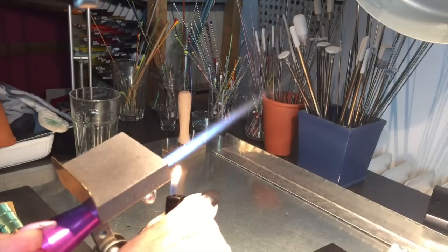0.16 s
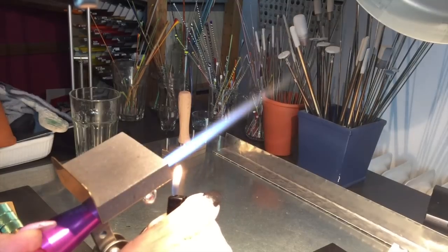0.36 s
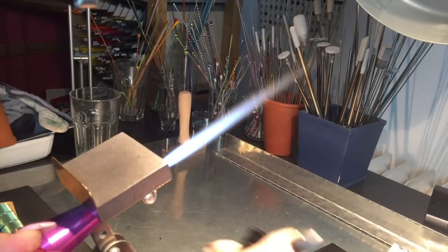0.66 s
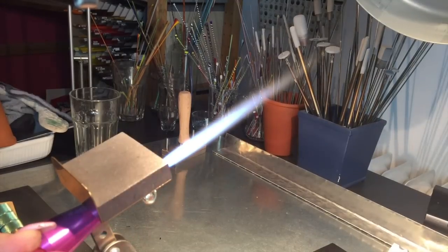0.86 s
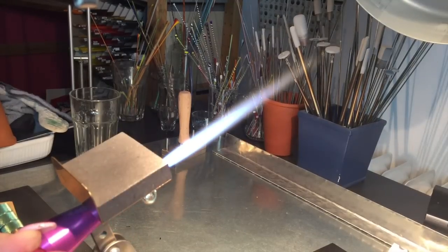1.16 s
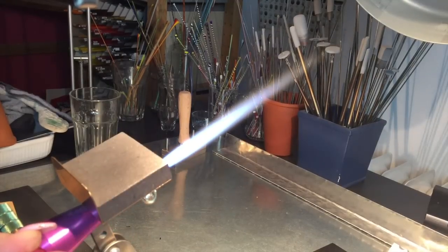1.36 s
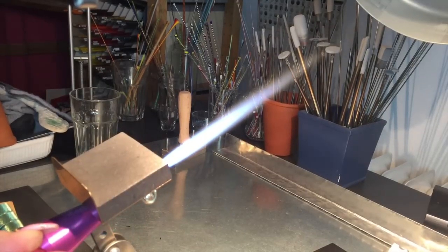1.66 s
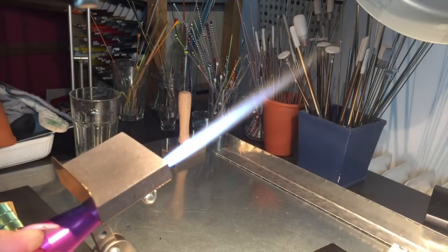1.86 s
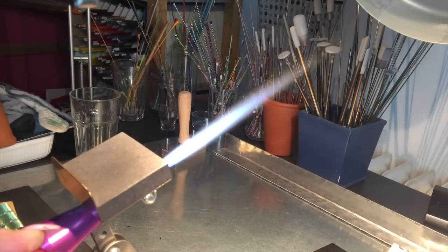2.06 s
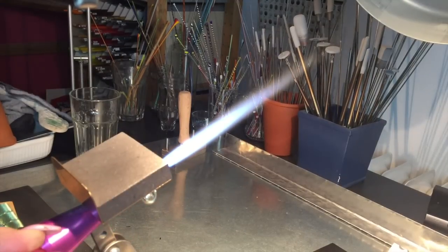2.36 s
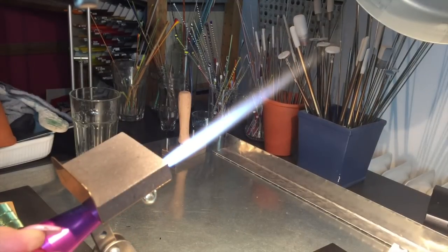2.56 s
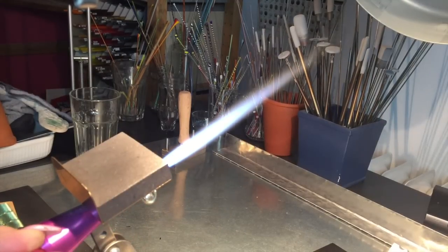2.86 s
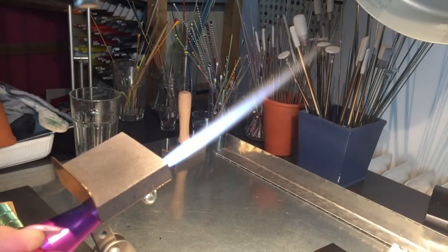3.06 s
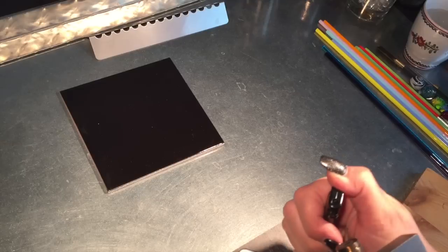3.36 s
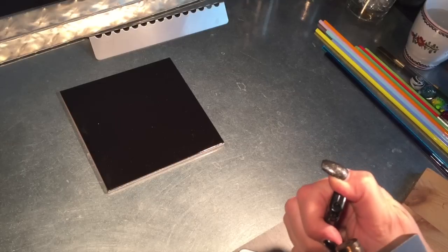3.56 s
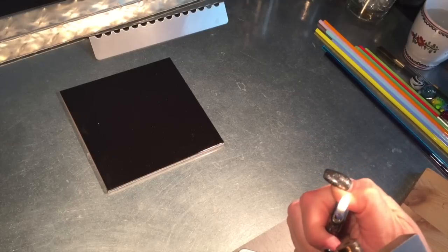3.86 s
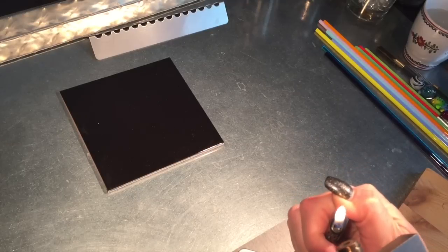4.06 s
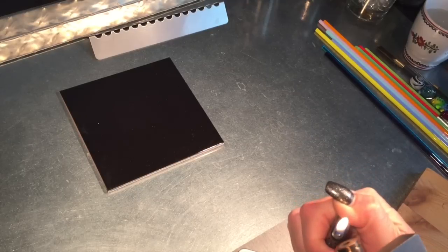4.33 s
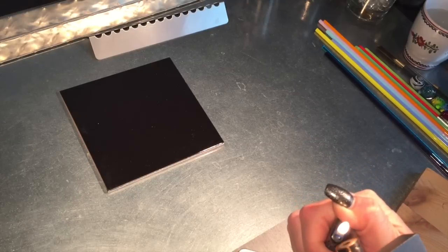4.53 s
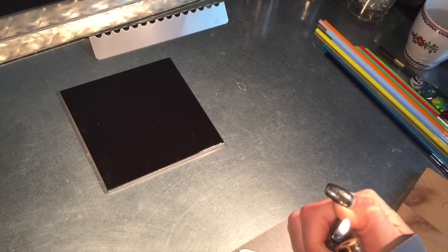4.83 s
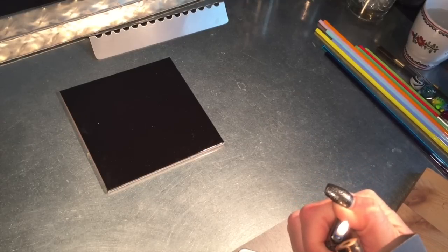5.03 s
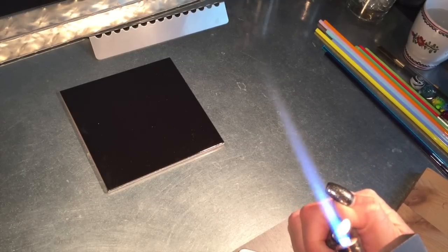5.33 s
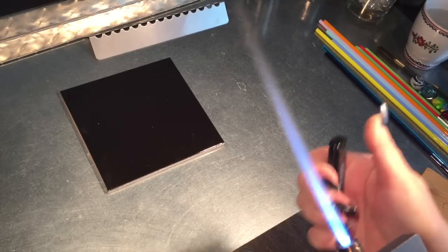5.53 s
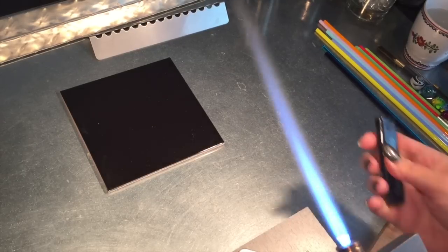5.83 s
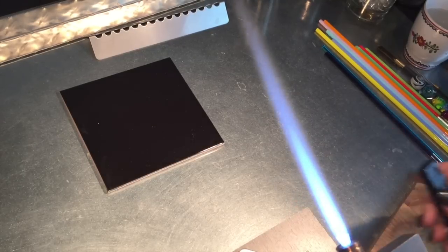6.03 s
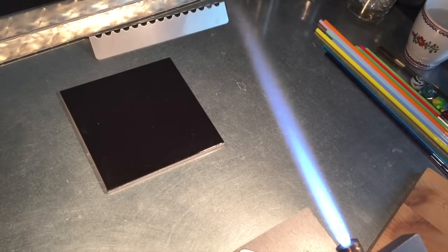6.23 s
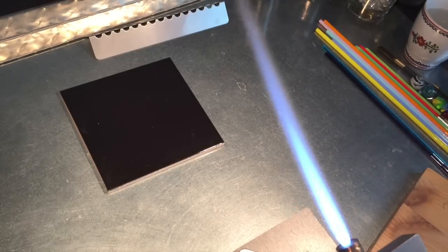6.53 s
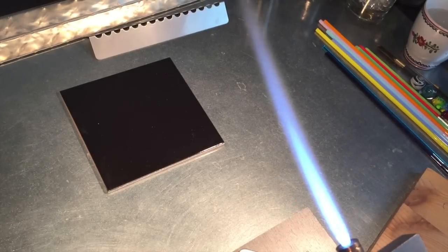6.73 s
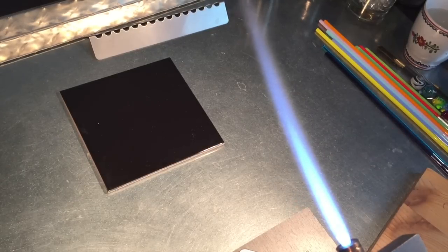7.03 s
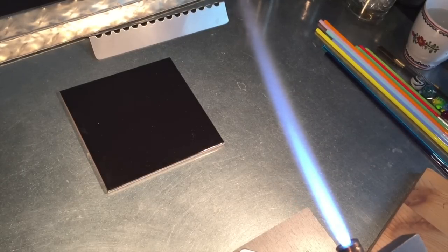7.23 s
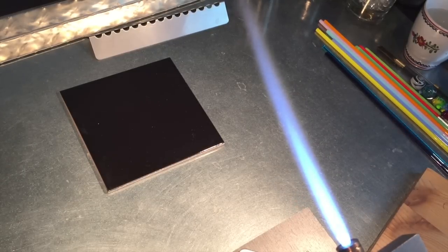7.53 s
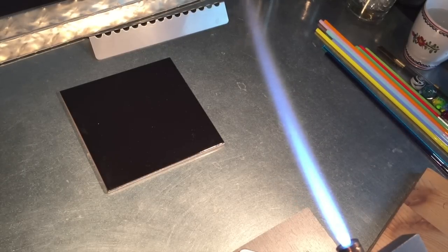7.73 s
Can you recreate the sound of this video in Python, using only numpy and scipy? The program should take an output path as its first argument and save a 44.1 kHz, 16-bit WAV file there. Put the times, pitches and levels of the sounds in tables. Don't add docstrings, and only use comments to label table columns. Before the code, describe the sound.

Three hard lighter clicks ring in a room, quiet background turning abruptly to louder rumble, then a faint gas flame flutters and the lighter scrapes down.

```python
import sys
import numpy as np
from scipy import signal
from scipy.io import wavfile
from scipy.ndimage import uniform_filter1d

SR = 44100
rng = np.random.default_rng(int(sys.argv[2]) if len(sys.argv) > 2 else 0)


def waveform_to_disk(signal):
    frames = np.transpose(np.atleast_2d(signal))
    scaled = np.clip(frames, -1, 1) * 32767
    samples = np.round(scaled).astype(np.int16)
    wavfile.write(sys.argv[1], SR, samples)


def magnitude_from_level(level_db):
    exponent = np.asarray(level_db, float) / 20
    return 10 ** exponent


N = 347799
CUT_S, LIT_S = 3.31, 5.3


def evened(x):
    return x / np.sqrt(np.mean(x ** 2) + 1e-20)


def read(points, hz):
    f, value = np.transpose(points)
    return np.interp(np.log(hz + 1), np.log(f + 1), value)


def curve(rows):
    return np.interp(np.arange(N) / SR, *np.transpose(rows))


def add(mix, s, sound):
    part = mix[round(s * SR):][:len(sound)]
    part += sound[:len(part)]


def wander(x, samples):
    return evened(uniform_filter1d(uniform_filter1d(x, size=samples), size=samples))


def ring(x, hz, width):
    r = np.exp(-np.pi * width / SR)
    return 2 * (1 - r) * signal.lfilter([1], [1, -r * np.exp(2j * np.pi * hz / SR)], x).real


def noise(shape, modes=(), patchy_db=4.0, size=4096):
    hz = np.fft.rfftfreq(size, 1 / SR)
    a, b, patches = rng.standard_normal((N * 4 // size + 5, len(hz), 3)).T
    patches = uniform_filter1d(patches, size=size // 128, axis=0)
    patches = evened(uniform_filter1d(patches, size=2, axis=1))
    db = read(shape, hz)
    for f, width, lift in modes:
        db = db + lift / (1 + (2 * (hz - f) / width) ** 2)
    z = (a + 1j * b) * magnitude_from_level(db[:, None] + patchy_db * patches)
    return evened(signal.istft(z, nperseg=size, noverlap=size * 3 // 4)[1][:N])


def room(x, slower):
    # pitch in Hz, time to fade by 60 dB in seconds.
    fade_times = [(250, 0.58), (660, 0.37), (1740, 0.45), (4590, 0.42), (8000, 0.29), (12100, 0.21),
                  (15000, 0.21)]
    taps = np.zeros(SR // 2)
    at = np.arange(100, SR // 2 - 20, 10)
    taps[at + rng.integers(0, 10, len(at))] = rng.choice([-1., 1.], len(at))
    hz, t, z = signal.stft(taps, SR, nperseg=128)
    t60 = slower * read(fade_times, hz)[:, None]
    tail = signal.istft(z * magnitude_from_level(-60 * t / t60), SR, nperseg=128)[1]
    return signal.fftconvolve(x, tail / np.linalg.norm(tail))[:N]


def colour(shape, tilt_db=0):
    hz = abs(np.fft.fftfreq(2048, 1 / SR))
    db = read(shape, hz) + tilt_db * np.log2(hz / 2000 + .05)
    log_gain = np.log(magnitude_from_level(np.maximum(db, -100)))
    return np.fft.ifft(np.exp(np.conj(signal.hilbert(log_gain)))).real[:1024]


def gain_control():
    # start in seconds, change in dB, fall time in seconds, hold time in seconds.
    ducks = [
        (3.753, -20, 0.013, 0.1),
        (5.291, -17.5, 0.071, 0.096),
        (7.08, -5, .08, 0.018),
    ]
    recover_s, rest_db = .21, -.5
    t = np.arange(N) / SR
    gain_db = rest_db * (t > CUT_S)
    for s, db, fall, hold in ducks:
        falling = np.clip((t - s) / fall, 0, 1)
        creeping_back = np.exp(-np.maximum(t - s - fall - hold, 0) / recover_s)
        gain_db = gain_db + db * falling * creeping_back
    return gain_db


def workshop():
    # pitch in Hz, level in dB per Hz.
    side_wash = [(15, -70), (25, -61), (48, -14), (91, -11), (113, 1.5), (152, -3.5), (254, 0), (361, -4.5),
                 (402, -17), (854, -14), (1120, -18.5), (1770, -19.5), (2440, -29.5), (14500, -63.5),
                 (15700, -63)]
    top_wash = [(15, -51), (25, -29.5), (113, -1.5), (247, -3), (299, -9), (361, -11.5), (498, -17),
                (652, -11.5), (951, -26), (1680, -24), (2080, -30.5), (7380, -48.5), (9930, -47),
                (15700, -54.5)]
    # pitch in Hz,
    # width in Hz, lift in dB (dips are negative).
    side_modes = [(128.5, 14, 3.5), (149, 9.5, -9), (197, 8.7, 5), (253, 22, 3), (360, 54, 2.5),
                  (520, 44, -8), (881, 32, 7.5), (1310, 34, 6), (1460, 6.4, -12), (1650, 33, 8.5),
                  (1800, 6.6, 11), (1840, 14, 13.5), (2692, 53, 10), (8150, 400, 7), (8730, 410, 8.5),
                  (9900, 490, 9), (10400, 200, -7)]
    top_modes = [(123.4, 15.3, 7.5), (147, 12.4, -15.5), (165.6, 6.1, 4.5), (253.6, 19.6, 9),
                 (294, 4.9, -7.5), (356.6, 16.8, 9), (458, 34, 7.5), (470, 10, -1), (656, 14, 8),
                 (588, 62, 2.5), (1103, 150, 8), (1622, 48, 11), (1748, 15, 16.5), (2720, 92, 8),
                 (3154, 18, 13), (5450, 72, 4), (8170, 180, 8.5), (8440, 34, 15.5), (10900, 220, -8),
                 (1220, 42, 7.5), (1806, 49, 9.5), (378, 5.4, 2), (862, 14.5, 11.5), (1886, 11, -12),
                 (2400, 51, 4.5)]
    side_db, top_db = -46.5, -28.5
    lamp_hz, lamp_side_db, lamp_top_db = 14261, -94, -79
    t = np.arange(N) / SR
    top = np.clip((t - CUT_S) / 0.014 + .5, 0, 1)
    waver_db = 2.7 * wander(rng.standard_normal(N), 6000)
    whine = magnitude_from_level(waver_db) * np.sqrt(2) * np.sin(2 * np.pi * lamp_hz * t) * (t < LIT_S)
    side_fan = magnitude_from_level(side_db) * noise(side_wash, side_modes, patchy_db=2.6, size=8192)
    top_fan = magnitude_from_level(top_db) * noise(top_wash, top_modes, patchy_db=0.7, size=8192)
    side_view = side_fan + magnitude_from_level(lamp_side_db) * whine
    top_view = top_fan + magnitude_from_level(lamp_top_db) * whine
    return (1 - top) * side_view + top * top_view


def nozzle():
    # pitch in Hz, width in Hz, level in dB.
    whistles = [
        (9870, 100, -2),
        (9930, 140, 4),
    ]
    unlit_db, lit_db, waver_db = -61.5, -66, 1.6
    follow = 0.64
    jet = rng.standard_normal(N)
    tone = sum(magnitude_from_level(db) * ring(ring(jet, hz, width), hz, width) for hz, width, db in whistles)
    level_db = np.where(np.arange(N) < LIT_S * SR, unlit_db, lit_db) + waver_db * wander(jet, 7000)
    return magnitude_from_level(level_db + follow * gain_control()) * evened(tone) * (np.arange(N) > CUT_S * SR)


def flame():
    # pitch in Hz, level in dB per Hz.
    rush = [(300, -14), (500, 3), (800, 1), (1260, 3.5), (1500, 4), (1750, -5), (1950, -6.5), (2600, -7),
            (4000, -30), (8000, -45)]
    # time in seconds, level in dB.
    growth = [
        (5.3, -31),
        (5.6, -41),
        (6.0, -40.5),
        (6.5, -38.5),
        (6.95, -37),
        (7.3, -38),
        (7.89, -38.5),
    ]
    flicker_db = evened(uniform_filter1d(rng.standard_normal(N), size=1500))
    burning = noise(rush, patchy_db=2.5, size=1024) * (np.arange(N) > LIT_S * SR)
    return magnitude_from_level(curve(growth) + flicker_db) * burning


def slide():
    # time in seconds, level in dB.
    rub = [
        (6.97, -65),
        (6.986, -43.5),
        (7.108, -43),
        (7.128, -36.5),
        (7.146, -39.5),
        (7.22, -61),
    ]
    # pitch in Hz, level in dB per Hz.
    scrape = [(350, -34), (600, -6.5), (1580, -8.5), (2520, -21.5), (4010, -24), (10700, -40.5),
              (12800, -41), (15700, -46)]
    # pitch in Hz, width in Hz, lift in dB.
    body_modes = [(3200, 410, 9), (4400, 360, 6.5), (6300, 350, 9), (8600, 300, 8), (12800, 500, 8),
                  (14000, 400, 6)]
    slips_per_s, slip_fade_s = 1100, .001
    slips = magnitude_from_level(2.5 * np.minimum(rng.exponential(1, N), 3)) * (rng.random(N) < slips_per_s / SR)
    slips = evened(np.convolve(slips, np.exp(-np.arange(400) / SR / slip_fade_s))[:N])
    grain = .55 + .55 * slips
    before, after = (rub[0][0] - .03, -90), (rub[-1][0] + .04, -90)
    level_db = curve([before] + [tuple(r) for r in rub] + [after]) + 7.5
    return magnitude_from_level(level_db) * grain * noise(scrape, body_modes, patchy_db=3.5, size=512)


def fingers():
    # time in seconds, peak in dB, pitch in Hz, width in Hz.
    taps = [(4.176, -50, 7000, 4000), (4.335, -54, 7000, 4000), (4.623, -51, 7040, 4000),
            (5.514, -48, 6000, 5000), (5.537, -37, 4550, 3000), (5.537, -38.5, 8500, 3000),
            (5.537, -33.5, 2000, 1500), (5.987, -42, 6300, 1500), (6.11, -52, 9000, 3000),
            (6.135, -42, 8500, 4000), (6.196, -48, 8000, 2000), (6.39, -40.5, 6460, 3000),
            (6.389, -48, 13000, 3000), (6.741, -40.5, 8000, 6000), (6.919, -33, 4250, 1500),
            (6.914, -42, 4000, 3000), (7.118, -22.5, 13300, 4000), (7.1185, -27, 5500, 7000),
            (7.1275, -19, 1730, 900), (7.128, -25.5, 9750, 7890), (7.128, -30, 3600, 2500)]
    # time in seconds, peak in dB, pitch in Hz, width in Hz.
    brushes = [(.433, -66, 9000, 600), (3.523, -45, 6300, 600), (3.523, -35.5, 9100, 3900),
               (3.524, -36, 14500, 2520), (3.525, -43, 3480, 1200), (6.555, -40.5, 8700, 3000),
               (6.555, -44, 12700, 2500), (6.66, -48, 12500, 3000), (6.75, -53, 12800, 1500),
               (7.0, -53, 12800, 800), (7.16, -56, 11700, 495)]
    # time in seconds, peak in dB, pitch in Hz, width
    # in Hz.
    rasps = [
        (.078, -59, 5000, 8000),
        (.564, -60.5, 2720, 60),
        (3.722, -40, 3000, 3000),
        (5.275, -40, 4000, 3000),
        (7.158, -26.5, 1740, 302),
    ]
    out, t = np.zeros(N), np.arange(3000) / SR
    for rows, ms in ((taps, 3.7), (brushes, 11), (rasps, 19)):
        for s, db, hz, width in rows:
            grit = rng.standard_normal(len(t)) * np.exp(-(1000 * t / ms) ** 2)
            sound = ring(ring(grit, hz, width), hz, width)
            add(out, s, magnitude_from_level(db) * sound / abs(sound).max())
    return out + magnitude_from_level(-3.5) * room(out, 0.69)


def puff():
    # level in dB, pitch in Hz, time to fade by 60 dB in seconds.
    db, hz, t60 = (-19.5, 72, 0.078)
    out, t = np.zeros(N), np.arange(6000) / SR
    swing = np.sin(2 * np.pi * hz * t) * (1 - np.exp(-t / 0.0043))
    add(out, 3.7475, -magnitude_from_level(db - 60 * t / t60) * swing)
    return out


def answer(rows, shape, db, slower):
    out, taps = np.zeros(N), colour(shape)
    loudest = max(rows, key=lambda row: row[1])
    add(out, loudest[0], taps / np.linalg.norm(taps))
    return magnitude_from_level(db) * room(out, slower)


def lighter(rows, body):
    out, t = np.zeros(N), np.arange(900) / SR
    for s, db, ms, tilt_db in rows:
        grit = rng.standard_normal(len(t))
        blow = (grit + (t == 0) / ms) * np.exp(-1000 * t / ms)
        sound = np.convolve(blow, colour(body, tilt_db))
        add(out, s, magnitude_from_level(db) * sound / abs(sound).max())
    return out


def scene():
    # time in seconds, peak in dB, rattle in ms, brightness in dB per octave.
    snaps = [
        [(.0998, -27, 1.5, -3), (.1012, -36, 1.2, 10), (.1031, 3.5, 0.2, 0.5), (.1048, -12.5, 2.1, 1.5),
         (.1079, -13.5, .6, -1)],
        [(3.728, -34, 2.4, 4), (3.748, -24, .4, -5), (3.7507, 0, 0.38, 0.5), (3.7513, -8, 1.8, 1.5),
         (3.7535, -17, 5.1, 15)],
        [(5.2932, -15, 2.3, -7), (5.2955, -20, 2.4, -5), (5.2975, -8, 0.87, -6.5), (5.2997, -6, 0.17, 10),
         (5.3006, 2, 0.53, -3), (5.303, -9, 1.4, -3)],
    ]
    # pitch in Hz, level in dB per Hz.
    grips = [
        [(47, -42), (80, 0), (767, 2), (1500, 4.5), (2290, -9.5), (3510, -0.5), (4490, -7.5), (5370, -22),
         (6720, -13), (7350, -24), (8590, -11), (11000, -24), (13400, -31), (15400, -28), (16800, -44)],
        [(180, -38), (300, 3), (1140, -14), (2120, -8.5), (2920, -3), (4910, -10), (5620, 1.5), (7240, -9),
         (8010, -7), (9810, -15), (11800, -2), (14900, -23), (15700, -3), (16800, -72)],
        [(240, -29.5), (400, -14), (1610, -0.5), (2200, -11), (3300, -10), (3920, -2), (6470, -17), (7220, -25),
         (8850, -14.5), (10700, -23), (15300, -28), (16000, -30), (16800, -71)],
    ]
    # pitch in Hz, level in dB per Hz.
    answers = [
        [(120, -37), (200, -5), (299, -6), (519, -11), (722, -3.5), (806, -7), (1400, -2.5), (1810, -12),
         (4120, -11), (5130, -30), (5940, -18), (7000, -20), (7560, -36), (8740, -20), (16000, -38)],
        [(590, -59), (1000, -32), (1100, -7), (1250, -23), (1310, -23), (1690, -7), (1870, -21), (2030, -15),
         (3010, -3.5), (4960, -9), (5630, -2), (7270, -8), (11700, -3.5), (16000, -10.5)],
        [(240, -48), (400, -15), (512, -25), (598, -14), (801, -3), (1030, -14), (1130, -14), (1530, 1),
         (2250, -8.5), (4110, -10.5), (6540, -32.5), (8760, -15.5), (10700, -28), (16000, -22)],
    ]
    # level in dB, how many times slower it fades.
    echoes = [
        (-0.5, 0.96),
        (-6.5, 1.14),
        (-1, 1.07),
    ]
    hiss_db, edge_hz = -79.5, 15740
    mix = magnitude_from_level(gain_control()) * (workshop() + flame())
    mix = mix + nozzle() + slide() + fingers() + puff()
    mix = mix + magnitude_from_level(hiss_db) * rng.standard_normal(N)
    cracks = np.zeros(N)
    for rows, body, shape, echo in zip(snaps, grips, answers, echoes):
        mix = mix + answer(rows, shape, *echo)
        cracks = cracks + lighter(rows, body)
    edge = signal.firwin(401, edge_hz, window=("kaiser", 8), fs=SR)
    return (signal.oaconvolve(mix, edge, "same") + cracks)[None]


def roll_off(x):
    return signal.sosfilt(signal.butter(12, 16960, fs=SR, output="sos"), x)


def record(dry):
    limit = magnitude_from_level(-3.5)
    return roll_off(limit * np.tanh(dry / limit))


dry = scene()
out = record(dry)
waveform_to_disk(out)
```